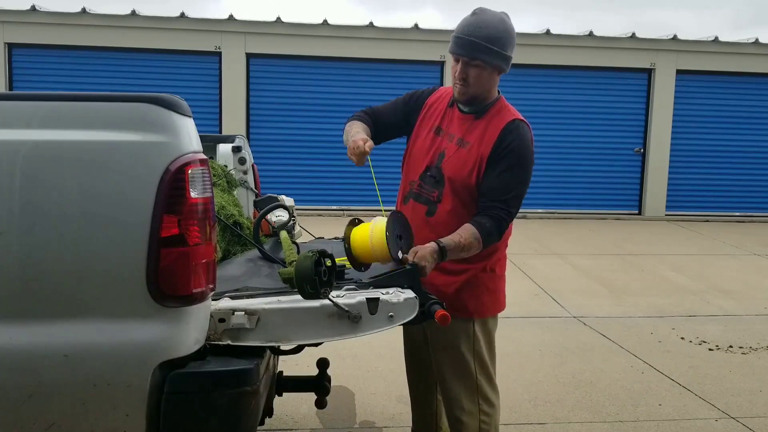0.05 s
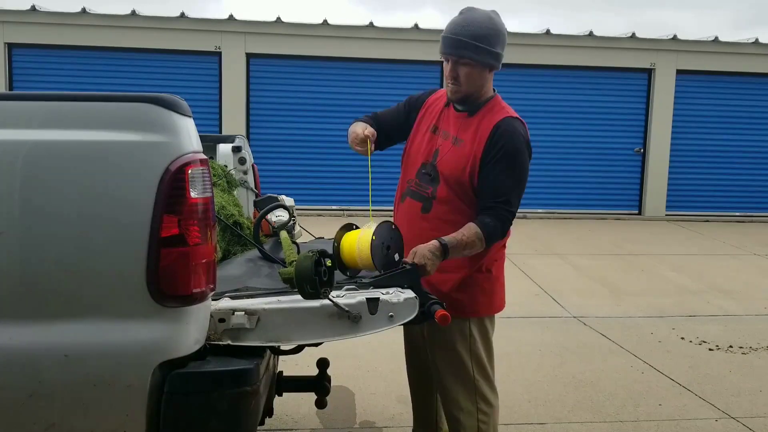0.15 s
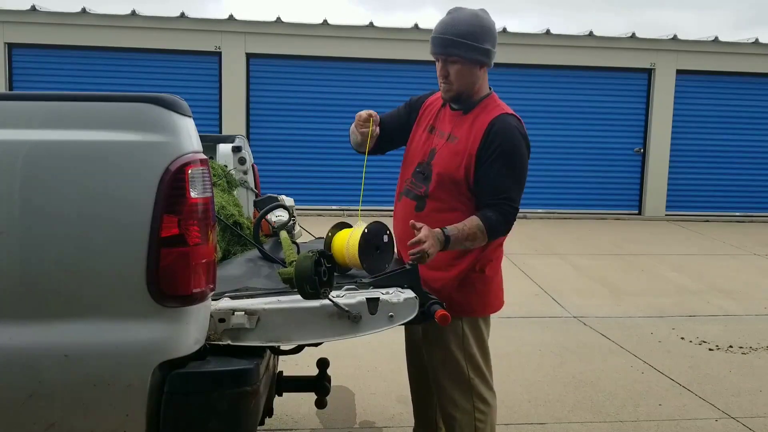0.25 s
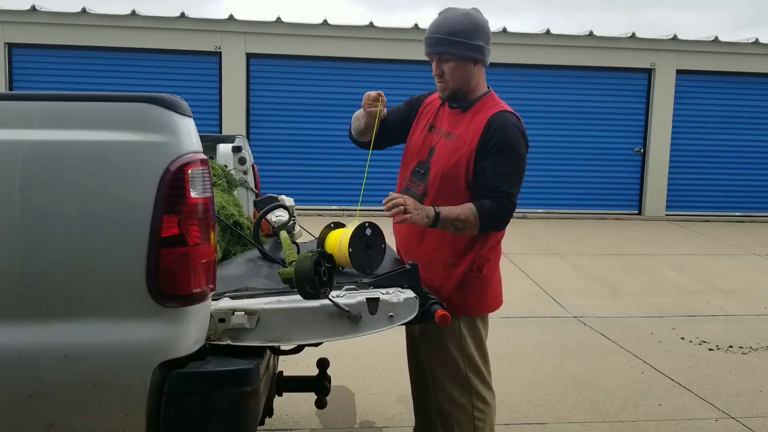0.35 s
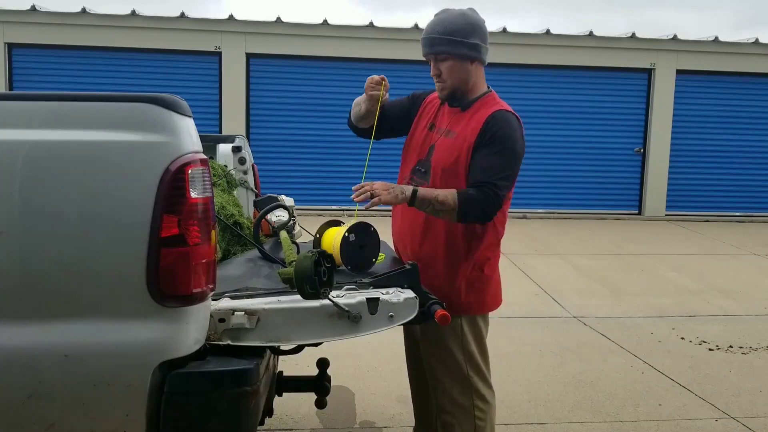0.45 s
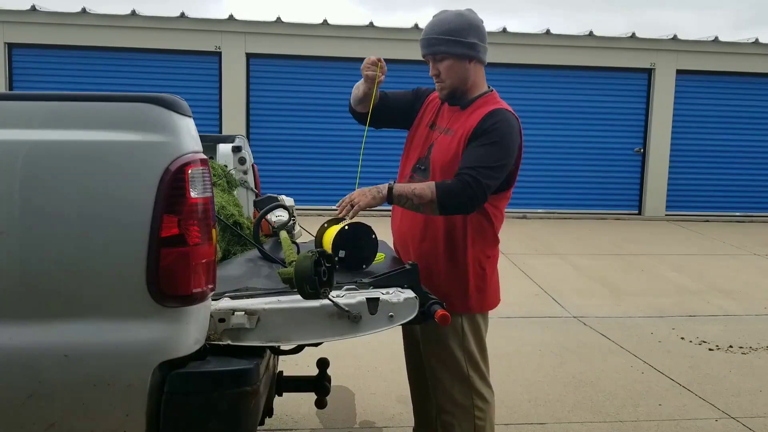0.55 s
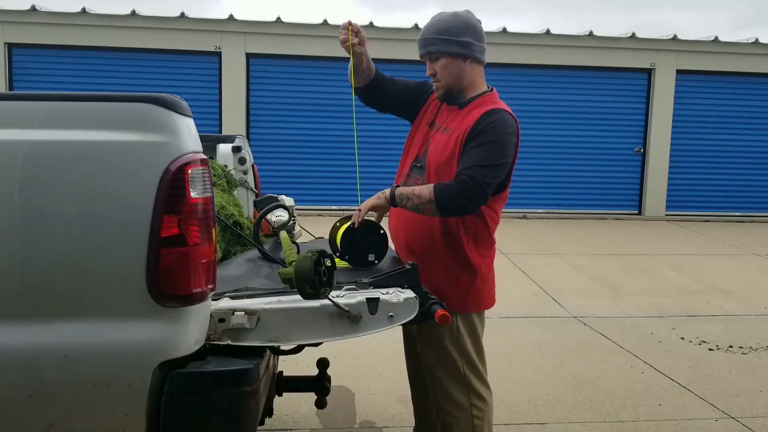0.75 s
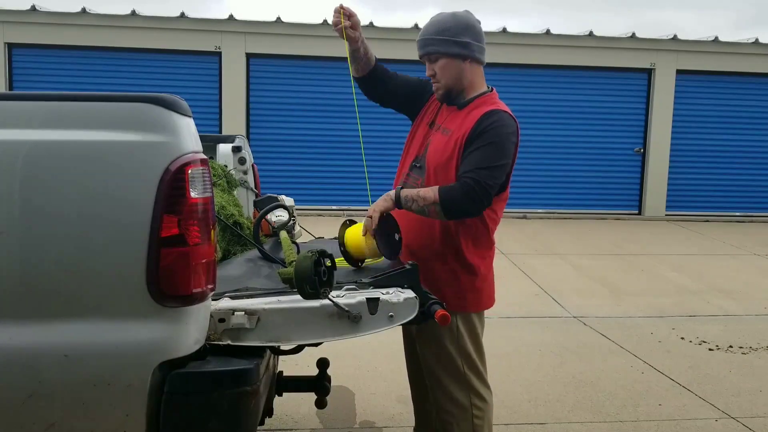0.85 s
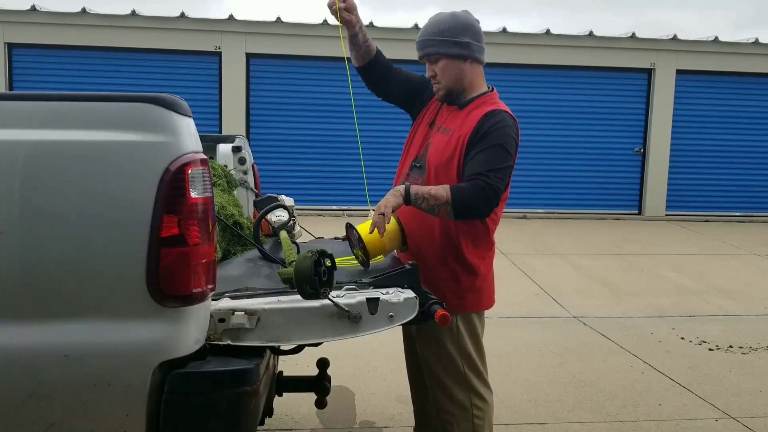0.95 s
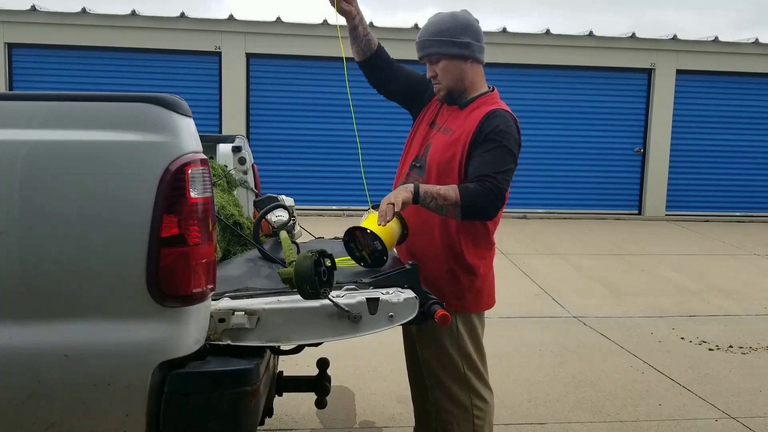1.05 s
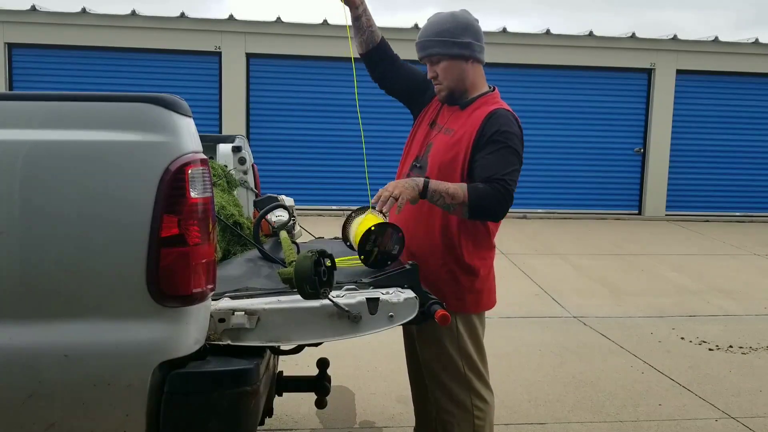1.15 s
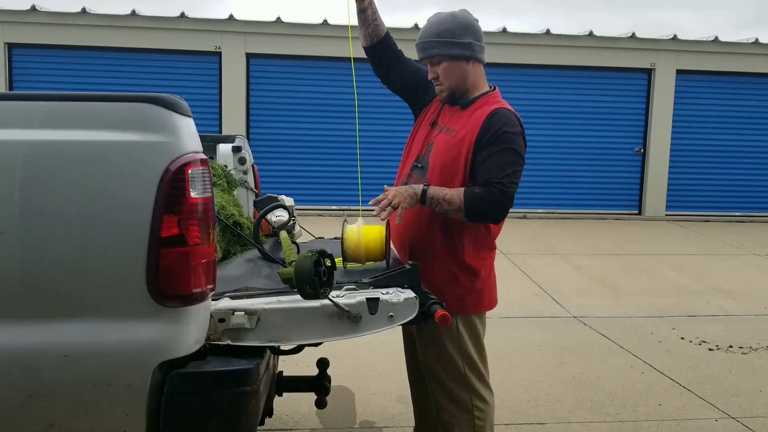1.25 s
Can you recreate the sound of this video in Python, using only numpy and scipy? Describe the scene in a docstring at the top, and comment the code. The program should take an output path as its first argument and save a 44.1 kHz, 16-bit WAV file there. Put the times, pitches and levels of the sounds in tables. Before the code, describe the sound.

A plastic spool drops and rocks on a pickup tailgate with a booming clatter, then rolls as line hisses and ticks off it. A lighter clatter follows. Heard close up outdoors, with light wind and a low distant hum.

```python
"""Outdoors, a stereo pair close to an open pickup tailgate; light wind and a low hum lie far behind.
A plastic spool of trimmer line clacks, drops on the gate and rocks on its flanges, so the panel booms.
The spool rolls over the ribs while line is pulled off with a soft hiss, ticking over the flange.
Near the one-second mark it tips over with a second, lighter clatter; one small clack comes last."""
import sys
import numpy as np
from scipy import signal
from scipy.fft import rfft, irfft
from scipy.io import wavfile

SR = 44100
rng = np.random.default_rng(int(sys.argv[2]) if len(sys.argv) > 2 else 0)


def inscribe(sig):
    """Save sig as 16-bit PCM at rate SR to the path in sys.argv[1].

    A 1-D sig is mono; a 2-D sig holds one channel per row.
    Samples are clipped to [-1, 1] before scaling.
    """
    pcm = np.round(np.clip(np.atleast_2d(sig).T, -1, 1) * 32767)
    wavfile.write(sys.argv[1], SR, pcm.astype(np.int16))


N = 57330
BASS_HZ, TREBLE_HZ = 373, 2690


def amp(db):
    """Decibels to gain."""
    return 10 ** (np.asarray(db) / 20)


def unit_rms(x):
    """Scales to unit rms."""
    return x / np.sqrt(np.mean(x ** 2) + 1e-20)


def lookup(table, hz, column=1):
    """One column of a table on a log-frequency axis."""
    columns = np.transpose(table)
    return np.interp(np.log(hz + 1), np.log(columns[0] + 1), columns[column])


def add(mix, start_s, sound):
    """Mixes a stereo sound in at a time."""
    part = mix[:, max(round(start_s * SR), 0):]
    part[:, :sound.shape[1]] += sound[:, :part.shape[1]]


def bins(size):
    """Frequencies of a spectrum."""
    return np.fft.rfftfreq(size, 1 / SR)


def drift(seconds):
    """A slow random wander of unit size."""
    smoothing = np.exp(-(bins(N) * seconds) ** 2)
    return unit_rms(irfft(rfft(rng.standard_normal(N)) * smoothing, N))


def stereo(pair, image):
    """Spectra of two unrelated signals, blended and balanced as the microphones hear them."""
    hz, (a, b) = bins(pair.shape[1]), rfft(pair)
    likeness, pan_db = np.clip(lookup(image, hz), -1, 1), lookup(image, hz, column=2)
    mid, side = a * np.sqrt((1 + likeness) / 2), b * np.sqrt((1 - likeness) / 2)
    return np.array([(mid + side) * amp(pan_db / 2), (mid - side) * amp(-pan_db / 2)])


def tilt(hz, bass_db, treble_db):
    """How much of each frequency a blow excites."""
    return amp(bass_db / (1 + (hz / BASS_HZ) ** 2) + treble_db / (1 + (TREBLE_HZ / (hz + 1)) ** 4))


def panel_lift(hz, lift_db=3, half_width_hz=11.7):
    """The tailgate lifts whatever sounds near its modes."""
    nearness = sum(1 / (1 + ((hz - mode[0]) / half_width_hz) ** 2) for mode in PANEL_MODES)
    return amp(lift_db * np.minimum(nearness, 1))


def envelope(t, hz, t60, bloom_s=0.002, bloom_hz=900):
    """Treble starts at once, bass takes milliseconds to spread; then the sound dies away."""
    bloom = 1 - np.exp(-t * (1 + hz / bloom_hz) / bloom_s)
    return bloom * np.exp(-np.log(1000) * t / t60)


# Close sounds at the microphones. Each row: frequency in Hz, likeness from -1 to 1, left over right in dB.
NEAR_IMAGE = [(60, 0.97, 1.5), (246, 0.96, 3), (590, 0.8, 2.5), (1300, 0.26, 6), (2370, 0.1, 7),
              (5260, 0.19, -0.5), (9000, -.2, 3.5), (13500, -.2, -1)]

def ring(table, bass_db=0, treble_db=0, size=24000, crack_db=-2.5, crack_s=0.0067):
    """Countless close modes: a sharp crack, then each band dies at its own speed."""
    t, hz = np.arange(size) / SR, bins(size)
    noise = stereo(rng.standard_normal((2, size)), NEAR_IMAGE)
    spectrum = noise * amp(lookup(table, hz)) * tilt(hz, bass_db, treble_db) * panel_lift(hz)
    centres, _, t60s = np.transpose(table)
    out = np.zeros((2, size))
    for share, centre, t60 in zip(np.eye(len(table)), centres, t60s):
        band = irfft(spectrum * lookup(np.c_[centres, share], hz), size)
        out += band * envelope(t, centre, t60)
    return out * (1 + amp(crack_db) * np.exp(-t / crack_s))


def modes(table, bass_db=0, treble_db=0, rise_s=1 / SR, size=30000):
    """The clear modes of a struck body; a soft contact starts them gradually."""
    t = np.arange(size) / SR
    out = np.zeros((2, size))
    for hz, db, t60 in table:
        tone = np.sin(2 * np.pi * hz * t) * envelope(t, hz, t60)
        pan = amp(lookup(NEAR_IMAGE, hz, column=2) * np.array([[.5], [-.5]]))
        out += amp(db) * tilt(hz, bass_db, treble_db) * tone * pan
    return out * (1 - np.exp(-t / rise_s))


def friction(curve, colour, per_s, spread_db):
    """A stream of tiny impacts of uneven size that follows a level curve."""
    hz = bins(N)
    impacts = (rng.random((2, N)) < per_s / SR) * rng.choice([-1, 1], (2, N))
    sizes = amp(spread_db * np.minimum(rng.exponential(1, (2, N)), 4))
    spectrum = stereo(unit_rms(impacts * sizes), NEAR_IMAGE) * amp(lookup(colour, hz)) * panel_lift(hz)
    level = amp(np.interp(np.arange(N) / SR, *np.transpose(curve)))
    return level * irfft(spectrum, N)


# Far air at the microphones. Each row: frequency in Hz, likeness from -1 to 1, left over right in dB.
FAR_IMAGE = [(60.3, 0.98, 1.5), (245, 0.88, 2.8), (590, 0.15, 3.7), (1290, -0.18, 3.5), (2470, 0.5, 10.7),
             (5250, -0.61, 0.7), (8400, 0.69, 0.55), (13700, -0.23, .5)]
# Open air around the truck. Each row: frequency in Hz, level in dB per Hz.
AIR_COLOUR = [(20, -25), (35, -34), (55, -29.5), (95, -27.5), (200, -31), (330, -40), (480, -41),
              (1000, -42.5), (1900, -47.5), (3000, -57.5), (7000, -54.5), (9000, -70.5), (12500, -54.5),
              (16000, -52)]

def wind(gust_db=3, gust_s=0.02):
    """Light wind and distant air, unsteady in the bass."""
    hz = bins(N)
    air = stereo(rng.standard_normal((2, N)), FAR_IMAGE) * amp(lookup(AIR_COLOUR, hz))
    bass_share = 1 / (1 + (hz / BASS_HZ) ** 2)
    gusts = amp(gust_db * drift(gust_s))
    return irfft(air * bass_share, N) * gusts + irfft(air * (1 - bass_share), N)


# Far-off tones. Each row: pitch in Hz, level in dB.
HUM_TONES = [(94, -49), (140, -51.5), (283, -56)]

def distant_hum(waver=0.0215, waver_s=0.097):
    """A low hum, a little left of centre, its tones wavering together in pitch."""
    clock = np.cumsum(1 + waver * drift(waver_s)) / SR
    hum = sum(amp(db) * np.sin(2 * np.pi * (hz * clock + rng.random())) for hz, db in HUM_TONES)
    return hum * amp([[1], [-1]])


# Line sliding off the spool. Each row: time in seconds, level in dB.
SLIDE_LEVEL = [(0, -5), (.17, -0.5), (.205, -1), (.3, 4), (.5, -9), (.61, -7), (.65, -0.5), (.7, -6),
               (.79, -2.5), (.84, -9.5), (.92, -4), (.96, -5), (1.09, 3.5), (1.15, -6.5), (1.25, -12),
               (1.3, -5.5)]
# Its hiss. Each row: frequency in Hz, level in dB per Hz.
SLIDE_COLOUR = [(300, -84), (1500, -48.5), (4200, -47.5), (7000, -53.5), (9000, -57.5), (12500, -50.5),
                (16000, -48)]
# Line slipping over the flange. Each row: start in seconds, level in dB.
TICKS = [(0.217, 4), (0.3425, 3.5), (0.636, 7.5), (0.738, -3), (0.765, 5.5), (0.941, -6), (1.053, 7),
         (1.088, 1), (1.112, -7), (1.195, -1.5)]
# One tick. Each row: frequency in Hz, level in dB per Hz, t60 in seconds.
TICK_RING = [(300, -58, 0.01), (1690, -43, 0.04), (4000, -51.5, 0.015), (9400, -56.5, 0.039),
             (13600, -51, 0.02)]

def trimmer_line():
    """Close to the microphones, line hisses off the spool in tiny slips and ticks over its flange."""
    out = friction(SLIDE_LEVEL, SLIDE_COLOUR, per_s=2800, spread_db=0.5)
    for start_s, db in TICKS:
        add(out, start_s, amp(db) * ring(TICK_RING, size=4000))
    return out


# The spool crossing the ribs. Each row: time in seconds, level in dB.
ROLL_LEVEL = [(0, -14.5), (.2, -7), (.42, -1.5), (.5, -3.5), (.59, -5.5), (.65, -6), (.70, -7), (.78, -1),
              (.84, -5), (.92, -12), (.97, -5), (1.04, -5), (1.1, -10), (1.24, -24), (1.3, -0.5)]
# Its rumble. Each row: frequency in Hz, level in dB per Hz.
ROLL_COLOUR = [(40, -52), (130, -29.5), (230, -28.5), (345, -28), (450, -40), (580, -33.5), (850, -47),
               (1120, -40), (1700, -44), (2700, -58), (8000, -79)]
# Soft bumps on the way. Each row: start in seconds, level in dB, bass lift in dB.
BUMPS = [(0.635, -8, 29), (0.661, -21, 8), (0.71, -7.5, 24.5), (0.727, -16, -11), (0.788, 0, -11),
         (0.942, 11.5, -14), (0.9605, 16, -9.5), (0.974, 3, -27), (1.0, 7, -25), (1.018, 11, -5.5),
         (1.03, -1, -7.5), (1.277, -7.5, 14.1)]
# The spool's hollow drum. Each row: pitch in Hz, level in dB, t60 in seconds.
DRUM_MODES = [(290, -48.5, 0.15), (340, -41, 0.095), (363, -54, 0.071), (587, -49.5, 0.07),
              (648, -50.5, 0.062), (785.4, -53.5, 0.078)]

def spool_rolling():
    """The spool rumbles over the ribbed panel, and soft bumps sound its drum."""
    out = friction(ROLL_LEVEL, ROLL_COLOUR, per_s=460, spread_db=1.5)
    for start_s, db, bass_db in BUMPS:
        add(out, start_s, amp(db) * modes(DRUM_MODES, bass_db, rise_s=0.0037, size=8000))
    return out


# Light clacks of the spool alone. Each row: start in seconds, level in dB.
CLACKS = [(.1507, 1.5), (.162, -11), (.1985, -8.5), (.215, -9.5), (0.3422, -4), (.746, -14.5), (.767, -12),
          (0.9386, -7), (0.9848, -5.5), (1.277, -16.5)]
# Its short rattle. Each row: frequency in Hz, level in dB per Hz, t60 in seconds.
SPOOL_RING = [(200, -78, 0.032), (684, -27.5, 0.039), (1510, -30, 0.055), (2620, -38.5, 0.1),
              (4080, -46.5, 0.23), (9040, -51, 0.053), (14000, -47.5, 0.13)]
# Its plastic body. Each row: pitch in Hz, level in dB, t60 in seconds.
SPOOL_MODES = [(653, -41.5, 0.1), (962, -42.5, 0.072), (1305, -37.5, 0.021), (1340, -55, 0.15),
               (1462, -45, 0.093), (1784, -55, 0.055)]
# The flange's edge hitting metal. Each row: start in seconds, level in dB.
CRACKS = [(0.245, -8), (.3422, -7.5)]
# The flange's tones. Each row: pitch in Hz, level in dB, t60 in seconds.
FLANGE_MODES = [(2600, -27, 0.046), (2830, -37, 0.015), (3550, -33, 0.024), (4400, -40, .025)]

def spool_clacks():
    """Close up, the hollow plastic clacks and its hard flange cracks against the gate."""
    out = np.zeros((2, N))
    for start_s, db in CLACKS:
        add(out, start_s, amp(db) * ring(SPOOL_RING, size=8000))
        add(out, start_s, amp(db) * modes(SPOOL_MODES, size=8000))
    for start_s, db in CRACKS:
        add(out, start_s, amp(db) * modes(FLANGE_MODES, size=4000))
    return out


# The spool striking the gate. Each row: start in seconds, level in dB, bass and treble lifts in dB.
KNOCKS = [(0.2262, -4, 0, 0.5), (0.233, -6.5, -9, 10.5), (0.244, -6, 4.8, 11), (0.2521, -17.5, 13, 19.5),
          (0.2598, -12, -1, 7), (0.2799, -21.5, 20, -17), (0.3019, -13.5, 12, 5.2), (0.337, -15, 0.5, 15),
          (0.342, -11.5, -0.7, 16.5), (0.3478, -17, 17.5, 17), (0.3541, -17, 13, 19.5),
          (0.3675, -19.5, 13, 18), (0.9379, -18.5, 4.5, -24), (0.9442, -27, 6, 14), (0.961, -27, 9, 9),
          (0.974, -24.7, 1, 0), (0.984, -21.5, -2, -14), (1.018, -36, 19, 0.6)]
# The panel and loose gear on it. Each row: frequency in Hz, level in dB per Hz, t60 in seconds.
PANEL_RING = [(30.2, -56, 0.18), (71, -12.5, 0.3), (144, -14.5, 0.35), (350, -8.5, 0.43), (505, -15, 0.6),
              (940, -18, 0.38), (1020, -12, 0.2), (1836, -16.5, 0.22), (2510, -35, 0.6), (3720, -37, 0.37),
              (5000, -44.5, 0.24), (6900, -48, 0.32), (8500, -59, 0.33), (10800, -53.5, 0.33),
              (13000, -46, 0.2), (16000, -44.5, 0.25)]
# The panel's clear tones. Each row: pitch in Hz, level in dB, t60 in seconds.
PANEL_MODES = [(92.5, -46, 0.5), (137.3, -33, 0.4), (155.6, -40.5, 0.74), (188.9, -42, 1),
               (269.1, -42, 0.95), (306.3, -33, 0.41), (388, -32.5, 0.2), (450, -47.5, 0.51),
               (490.8, -37.5, 0.56), (573, -27, 0.21), (682.5, -31, 0.39), (795, -42, 0.32),
               (1037.4, -33.5, 0.33), (1150, -44.5, 0.35), (1337, -35.5, 0.11), (1404, -44.5, 0.088),
               (1808, -51, 0.17), (2013, -44.5, 0.065), (2089, -50, 0.25)]
# The whole gate giving under the spool. Each row: start in seconds, level in dB, pitch in Hz.
THUDS = [(0.2274, -19, 102.3), (0.2766, -31, 82), (0.2744, -25, 145.2), (0.3458, -13.5, 150),
         (0.464, -30.5, 153), (0.4932, -25.5, 181.5), (0.7795, -38, 133), (0.9705, -29.5, 67.3)]

def tailgate(thud_t60_s=0.094):
    """Each knock sets the nearby panel booming and rattling; the spool's shifting weight only thuds."""
    out = np.zeros((2, N))
    for start_s, db, bass_db, treble_db in KNOCKS:
        add(out, start_s, amp(db) * ring(PANEL_RING, bass_db, treble_db))
        add(out, start_s, amp(db) * modes(PANEL_MODES, bass_db, treble_db))
    for start_s, db, hz in THUDS:
        add(out, start_s, modes([(hz, db, thud_t60_s)], rise_s=0.0061, size=8000))
    return out


def scene():
    """Tailgate, spool and line up close, with the open air behind."""
    return tailgate() + spool_rolling() + spool_clacks() + trimmer_line() + wind() + distant_hum()


def record(dry):
    """The recorder's low cut and band limit."""
    low_cut_hz, top_hz = 53.4, 15900
    low_cut = signal.butter(2, low_cut_hz, "high", fs=SR, output="sos")
    band_limit = signal.firwin(511, top_hz, window=("kaiser", 9), fs=SR)
    return signal.oaconvolve(signal.sosfilt(low_cut, dry), band_limit[None], "same", axes=1)


dry = scene()
out = record(dry)
inscribe(out)
```